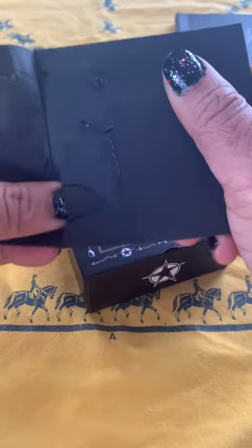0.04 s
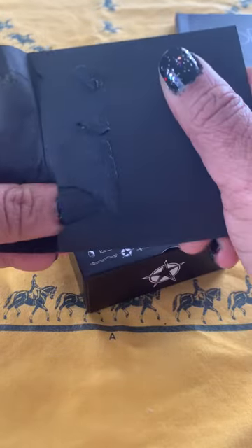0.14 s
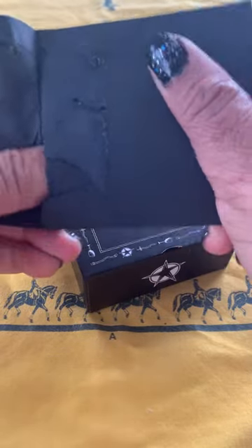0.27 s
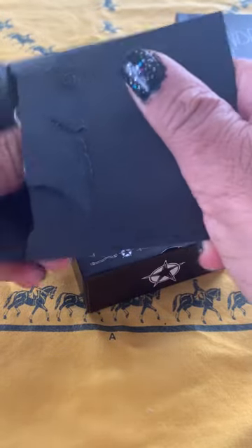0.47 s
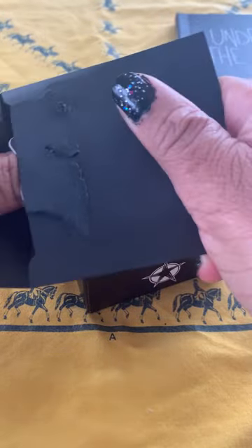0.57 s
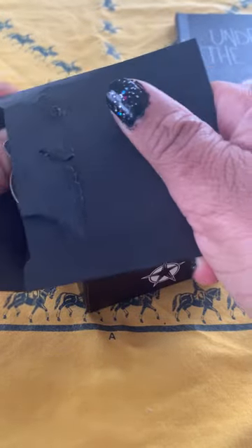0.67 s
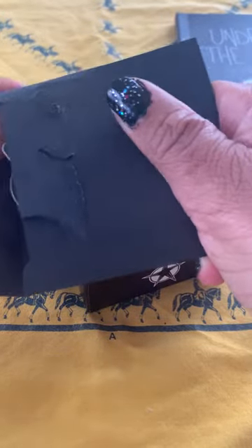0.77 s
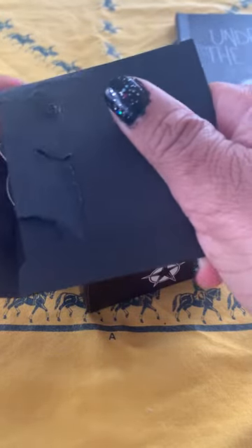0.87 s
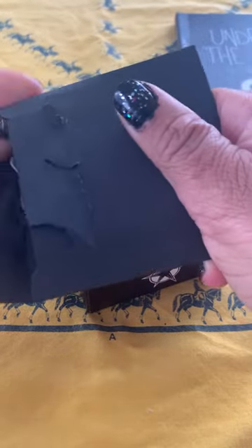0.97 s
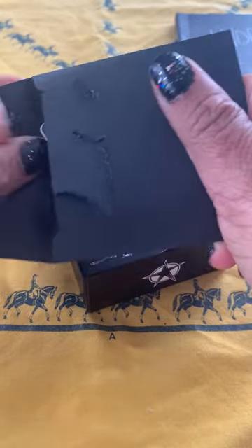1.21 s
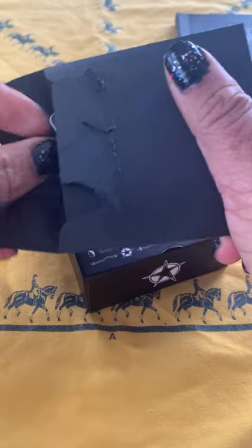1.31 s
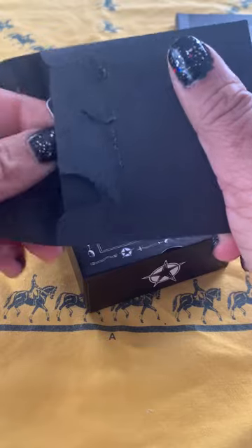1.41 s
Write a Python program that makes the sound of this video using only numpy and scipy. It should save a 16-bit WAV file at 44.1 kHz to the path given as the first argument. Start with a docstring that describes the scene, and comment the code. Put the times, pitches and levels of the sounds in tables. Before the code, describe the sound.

Stiff paper envelope pulled open by hand, sharp crackling snaps and short rips, close up indoors

```python
"""Indoors, close to a phone: hands pull open a stiff paper envelope over a faint room rumble.
Creases and glued fibres snap as noise bursts that also ring the sheet; rips are dense crackle,
buckling panels thud as sagging sine wobbles, and sliding fingers are patchy noise with fine grit.
The phone spreads its microphone signal over two channels with a phase shift that varies with frequency."""
import sys
import numpy as np
from scipy import signal
from scipy.fft import rfft, irfft, next_fast_len
from scipy.io import wavfile
from scipy.ndimage import uniform_filter1d, map_coordinates

SR = 44100
rng = np.random.default_rng(int(sys.argv[2]) if len(sys.argv) > 2 else 0)


def put_to_file(sound):
    """Save the sound as 16-bit audio at rate SR, in the file named by the first command-line argument."""
    columns = np.atleast_2d(sound).T  # one column per channel
    safe = np.clip(columns, -1, 1)
    whole_steps = np.round(safe * 32767)
    wavfile.write(sys.argv[1], SR, whole_steps.astype(np.int16))


def boost(x):
    """Linear amplitude factor 10**(x/20) for a level x in decibels (scalar or array-like)."""
    u = np.asarray(x, float) / 20
    return 10 ** u


N = 63945

# fibres and creases letting go: start_s, peak_db, bright_band_hz, relative_ring_db, t60_ms
FIBRE_SNAPS = [(0.2454, -14, 5900, -15.5, 6), (0.2472, -12.5, 5100, -14, 18), (.260, -25, 9930, -31, 6),
               (.281, -28, 9000, -28, 4.1), (0.285, -29, 12000, -27.5, 7.5), (.290, -2.5, 9640, -16, 5.9),
               (.293, -27, 9500, -26, 11), (0.2956, -26, 11000, -30, 5), (0.318, -30, 1990, -19, 6.3),
               (0.3232, -5, 8800, -14.5, 4.3), (0.336, -18.5, 10500, -20, 12), (.343, -30, 4000, -21, 6),
               (.3633, -2.5, 8700, -12.5, 14), (.364, -11, 13400, -22, 5.2), (.3675, -6.5, 4800, -18, 6.2),
               (0.369, -10, 4840, -25, 8), (.372, -6.5, 4880, -36, 23), (0.373, -2, 10600, -20, 4),
               (.377, -4, 9900, -9, 4.3), (.386, -2.5, 11200, -12.5, 2.3), (.3903, -5, 4430, -7.5, 22),
               (0.3941, -4.5, 4400, -18, 15), (.398, -4, 3100, -9.5, 5.9), (0.4, -39, 3000, -12, 12),
               (0.4054, -15, 5000, -29, 5.8), (.4093, -16, 4450, -8, 3.5), (0.4152, -33, 9100, -35, 4.4),
               (.425, -9.5, 9000, -17.5, 6), (.491, -28, 3000, -20, 14), (.507, -22.5, 3490, -21, 8.9),
               (0.665, -28, 10000, -42, 6), (.669, -9.5, 6550, -22, 12), (0.675, -8.5, 5300, -24, 13),
               (.680, -8, 6500, -25, 10.5), (0.6971, -12, 4370, -20, 12.5), (.716, -17.5, 5600, -39, 5.2),
               (0.7229, -13.5, 10700, -35, 8.3), (0.7253, -9, 6800, -35, 11),
               (.765, -10.5, 6100, -19.5, 5.2), (0.769, -5.5, 6300, -20, 5.7),
               (.770, -4.5, 4700, -10, 11.4), (0.772, -9.5, 8900, -16, 10.3), (.926, -12, 8000, -22, 7.5),
               (1.363, -27, 4000, -29, 14), (1.368, -23, 4160, -22, 21)]
# resonances of the ringing sheet: centre_hz, width_hz, gain_db
SHEET_MODES = [(607, 270, -3.5), (1077, 237, 3.5), (1424, 450, -3), (2083, 180, 3), (3050, 310, -2.5)]
# tears running through the paper: start_s, end_s, relative_level_db, rise_s, decay_s
TEARS = [(0.357, 0.411, -24.5, 0.023, 0.015), (0.666, 0.68, -34.5, 0.0013, 0.011),
         (0.76, 0.7716, -24.5, 0.0076, 0.001), (1.355, 1.374, -31, 0.0082, 0.0055)]
# colour of tearing fibres: frequency_hz, relative_gain_db
TEAR_COLOUR = [(200, -18), (600, -8.5), (1200, -12), (3000, 1), (4800, 1.5), (8000, -7.5), (12000, -9),
               (15800, -23), (16100, -50)]
# panels buckling, big ones low: start_s, peak_db, pitch_hz, t60_ms
PANEL_THUDS = [(0.244, -32, 1380, 18), (.248, -36, 480, 20), (0.29, -35.5, 327, 34),
               (.322, -25.5, 1920, 21), (.365, -29.5, 324, 15), (.396, -20.5, 521, 21.6),
               (.400, -26.5, 238, 44), (.4088, -8.5, 1160, 9.4), (.411, -35, 163, 21),
               (0.414, -44, 59.5, 110), (0.6698, -33.5, 1010, 22), (.670, -28.5, 634, 14.6),
               (0.688, -46.5, 111, 48), (.768, -26.5, 1060, 20), (.771, -31.5, 356, 46),
               (.772, -28.5, 167.5, 58), (.780, -34.5, 64.6, 130), (.9262, -27.5, 2390, 13),
               (.9265, -25.5, 1475, 12.7), (.928, -31, 892, 34), (1.009, -38.5, 213, 15),
               (1.108, -41.5, 276, 19), (1.131, -45, 225, 67), (1.364, -41, 935, 49), (1.369, -40, 160, 39),
               (1.383, -37.5, 148, 23)]
# fingers and paper sliding: time_s, relative_level_db, relative_scrape_over_hiss_db
HAND_MOVES = [(0, -46, 2.5), (0.041, -38, -0.5), (0.081, -46.5, 5), (0.129, -37.5, 1), (.18, -48.5, 5),
              (0.236, -31.5, -7), (.27, -47.5, 2), (.30, -41, 0.5), (.35, -45, 4), (.435, -39.5, 10),
              (0.471, -38.5, -2.5), (.50, -34.5, -5), (.54, -44.5, -0.5), (0.569, -53.5, 3), (.62, -41, -6),
              (.66, -38.5, -5), (.69, -38, 3.5), (.71, -59, 0), (.75, -42.5, -0.5), (.785, -63, 23),
              (.81, -51, 5), (0.872, -65, 2.5), (0.912, -42, 2), (0.969, -37.5, -7), (1.02, -41, -1),
              (1.07, -40.5, 0.5), (1.10, -42, 2), (1.17, -47, 0), (1.20, -42, -4), (1.228, -51, 0),
              (1.291, -39.5, -2.5), (1.35, -35.5, 0), (1.38, -41, 4.5), (1.45, -43.5, 0)]
# colour of the hiss on the flap: frequency_hz, relative_gain_db
FLAP_COLOUR = [(300, -38), (1500, -9.5), (3500, -7.5), (4400, -8), (5900, 3.5), (7600, -11), (9000, -1.5),
               (12000, -6.5), (15800, -8), (16000, -53)]
# colour of the hiss inside the envelope, and of the grit: frequency_hz, relative_gain_db
INSIDE_COLOUR = [(300, -23), (1500, -19.5), (3000, -4), (5000, 0.5), (7000, 1), (10000, -2), (13000, -5),
                 (15800, -9), (16000, -47)]
# colour of the duller scrape: frequency_hz, relative_gain_db
SCRAPE_COLOUR = [(150, -6.5), (400, -11), (1000, -3.5), (2000, 0), (3000, -4.5), (4500, -8.5), (9000, -46),
                 (15000, -80)]
# colour of the room rumble: frequency_hz, relative_gain_db
RUMBLE_COLOUR = [(20, -34), (40, -5.5), (65, 1), (105, -0.5), (200, -11), (350, -7.5), (600, -23),
                 (1500, -26.5), (4000, -46), (12000, -90)]
# decay of the room tail: frequency_hz, t60_s
ROOM_DECAY = [(200, 0.3), (2000, 0.25), (12000, 0.027)]
# phase between the phone channels: frequency_hz, left_lead_turns
CHANNEL_LEAD = [(0, 0), (600, -.08), (1300, -.08), (1700, 0), (2400, .19), (3600, .28), (4500, .47),
                (5000, .53), (6800, 1), (8900, 1.5), (10950, 2), (13100, 2.5), (15150, 3), (18000, 3.6)]
# level between the phone channels: frequency_hz, left_over_right_db
CHANNEL_TILT = [(60, -1.5), (500, -2), (1200, -2), (2400, -6), (3600, 1.46), (16000, -1)]


def unit(x):
    """Scales to rms 1."""
    return x / np.sqrt(np.mean(x ** 2) + 1e-20)


def along(points, hz):
    """Reads (Hz, value) points on a log frequency axis."""
    f, value = np.transpose(points)
    return np.interp(np.log(hz + 1), np.log(f + 1), value)


def filtered(x, response):
    """Multiplies the spectrum by a complex response of frequency."""
    size = next_fast_len(x.shape[-1] + 8192)
    spectrum = rfft(x, size) * response(np.fft.rfftfreq(size, 1 / SR))
    return irfft(spectrum, size)[..., :x.shape[-1]]


def peak(f, hz, width_hz):
    """Response of a causal resonance."""
    return 1j * f * width_hz / (hz * hz - f * f + 1j * f * width_hz)


def wobble(knots_per_s):
    """A smooth random curve through Gaussian knots."""
    knots = rng.standard_normal(int(N * knots_per_s / SR) + 4)
    return map_coordinates(knots, [np.arange(N) * knots_per_s / SR])


def patchy(colour, patchy_db):
    """Coloured noise of rms 1 whose gain varies in patches over time and frequency."""
    z = signal.stft(rng.standard_normal(N), nperseg=256)[2]
    field = uniform_filter1d(rng.standard_normal(z.shape), 8, 0)
    field = uniform_filter1d(field, 8, 1)
    x = signal.istft(z * boost(patchy_db * unit(field)), nperseg=256)[1][:N]
    return unit(filtered(x, lambda hz: boost(along(colour, hz))))


def crackle(ticks_per_s, spread_db, colour):
    """Tiny random bursts of noise, a few much larger than the rest; rms 1."""
    chance, size = rng.random((2, N))
    ticks = (chance < ticks_per_s / SR) * boost(-spread_db * np.log(size + 0.00107))
    envelope = np.convolve(ticks, np.exp(-np.arange(60) / 12))[:N]  # decay in samples
    bursts = envelope * rng.standard_normal(N)
    return unit(filtered(bursts, lambda hz: boost(along(colour, hz))))


def snaps():
    """Breaking fibres burst in a bright band each and kick the sheet into a short ring."""
    bright_q, broad_db, rise_s = 3.76, -15.5, 0.00014
    spike_db = 5.5  # the first break over the fibres that follow
    kick_db = 14  # how hard a snap drives the sheet
    t = np.arange(2048) / SR
    cracks, kicks = np.zeros(N + 2048), np.zeros(N + 2048)
    noise = rng.standard_normal((len(FIBRE_SNAPS), 2, 2048))

    for (start_s, peak_db, bright_hz, ring_db, t60_ms), (crack_noise, kick_noise) in zip(FIBRE_SNAPS, noise):
        def colour(f):
            bright = peak(f, bright_hz, bright_hz / bright_q)
            broad = boost(broad_db) * peak(f, 5100, 10700)
            return (bright + broad) / (1 + (f / 15600) ** 24)

        fade = boost(-60 * t / (t60_ms / 1000)) * (1 - np.exp(-t / rise_s))
        spike = 1 + boost(spike_db) * np.exp(-t / 0.00028)
        burst = filtered(crack_noise * fade * spike, colour)
        push = np.exp(-t / 0.0001) + 0.6 * kick_noise * fade
        first = round(start_s * SR)
        at = slice(first, first + len(t))
        cracks[at] += boost(peak_db) * burst / np.abs(burst).max()
        kicks[at] += boost(ring_db + kick_db) * push / np.linalg.norm(push)

    def sheet(f):
        # neighbouring modes have opposite signs
        return sum((-1) ** k * boost(db) * peak(f, hz, width_hz)
                   for k, (hz, width_hz, db) in enumerate(SHEET_MODES))

    return (cracks + filtered(kicks, sheet))[:N]


def rips():
    """Fibres part in a dense crackle while each tear runs, then die away exponentially."""
    t = np.arange(N) / SR
    run = np.zeros(N)
    for start_s, end_s, level_db, rise_s, decay_s in TEARS:
        rise = np.clip((t - start_s) / rise_s, 0, 1)
        run += boost(level_db) * rise * np.exp(-np.clip(t - end_s, 0, 1) / decay_s)
    fibres = crackle(ticks_per_s=5000, spread_db=3.5, colour=TEAR_COLOUR)
    return run * boost(2.3 * wobble(300)) * fibres


def thuds():
    """Each buckling panel swells within a cycle and dies, sagging in pitch."""
    rise_cycles, sag = 0.56, 0.11  # sag: largest share of the pitch lost
    out, t = np.zeros(N + SR), np.arange(SR // 4) / SR
    for start_s, peak_db, hz, t60_ms in PANEL_THUDS:
        fade = boost(-60 * t / (t60_ms / 1000))
        turns = np.cumsum(hz * (1 - sag * (1 - np.sqrt(fade)))) / SR
        shape = fade * (1 - np.exp(-(t * hz / rise_cycles) ** 2))
        thud = shape / shape.max() * np.sin(2 * np.pi * turns)
        out[round(start_s * SR):][:len(t)] += boost(peak_db) * thud
    return out[:N]


def slide():
    """Skin and paper rub on paper: a hiss, a duller scrape and fine grit, all following the hands."""
    flap_until_s, handover_s = 0.26, 0.058  # the fingers leave the flap
    slide_db, scrape_db, grit_db = -2, -7, -11.5
    loose_db = -7  # the part of the scrape that is unrelated in the two channels
    t = np.arange(N) / SR
    time_s, level_db, dull_db = np.transpose(HAND_MOVES)
    level_db = np.interp(t, time_s, level_db)
    dull_db = np.interp(t, time_s, dull_db)

    inside = np.clip((t - flap_until_s) / handover_s, 0, 1)
    hiss = np.sqrt(inside) * patchy(INSIDE_COLOUR, patchy_db=2.5)
    hiss += np.sqrt(1 - inside) * patchy(FLAP_COLOUR, patchy_db=1.5)
    grit = boost(grit_db) * crackle(ticks_per_s=2000, spread_db=4.5, colour=INSIDE_COLOUR)

    shared = patchy(SCRAPE_COLOUR, patchy_db=3.0)
    loose = np.array([patchy(SCRAPE_COLOUR, patchy_db=5.0) for _ in "LR"])
    scrape = boost(scrape_db + dull_db + 0.87 * wobble(40.42)) * (shared + boost(loose_db) * loose)
    return boost(level_db + slide_db + 1.36 * wobble(59.83)) * (hiss + grit + scrape)


def room(x):
    """A short soft tail of decaying noise for each channel; treble dies first."""
    hz, t, z = signal.stft(rng.standard_normal((2, SR // 3)), SR, nperseg=256)
    decay = boost(-60 * t / along(ROOM_DECAY, hz)[:, None])
    tail = signal.istft(z * decay, SR, nperseg=256)[1]
    delayed = np.pad(x, (90, 0))[None]  # delay in samples
    return signal.fftconvolve(delayed, tail / np.linalg.norm(tail[0]), axes=1)[:, :N]


def rumble():
    """Faint low room noise drifts slowly in level."""
    return boost(-57 + 2.9 * wobble(12.38)) * patchy(RUMBLE_COLOUR, patchy_db=0.5)


def scene():
    """The snaps, rips and thuds with their room tail, the sliding and the rumble."""
    paper = snaps() + rips() + thuds()
    return paper + boost(-25.5) * room(paper) + slide() + rumble()


def top_cut(x):
    """Nothing passes above the cut-off."""
    return signal.sosfilt(signal.butter(12, 16830, fs=SR, output="sos"), x)


def record(dry):
    """The phone splits phase and level between its channels and limits the band."""
    low_hz, top_hz = 43, 16600  # the microphone fades out below, stops above
    sign = np.array([[1], [-1]])  # left, right: half of each difference

    def split(hz):
        band = (hz < top_hz) * hz ** 2 / (hz ** 2 + low_hz ** 2)
        level = boost(sign * along(CHANNEL_TILT, hz) / 2)
        lead_turns = np.interp(hz, *np.transpose(CHANNEL_LEAD))
        return band * level * np.exp(1j * np.pi * sign * lead_turns)

    mix = filtered(dry, split)
    return top_cut(mix)


dry = scene()
out = record(dry)
put_to_file(out)
```